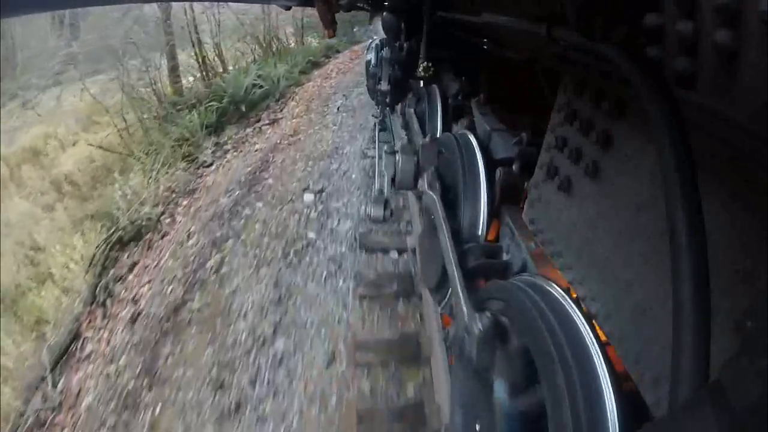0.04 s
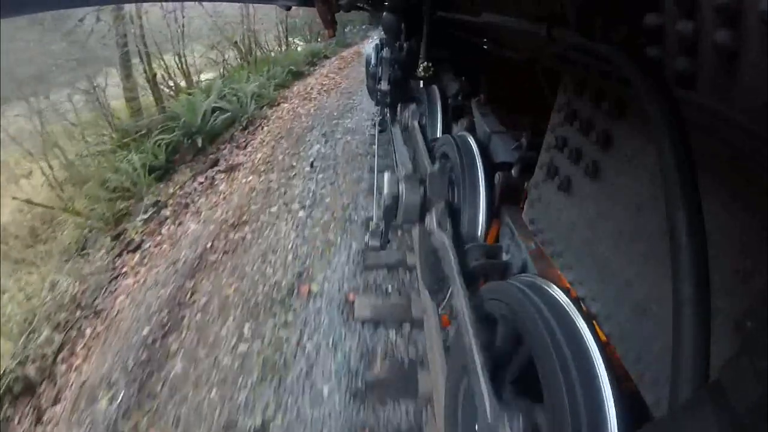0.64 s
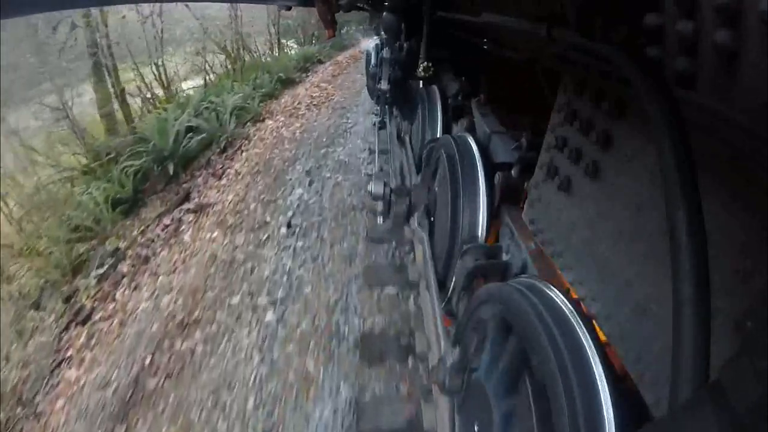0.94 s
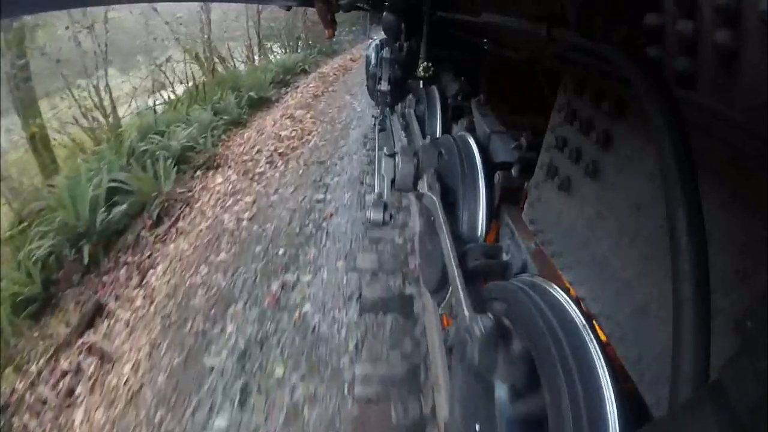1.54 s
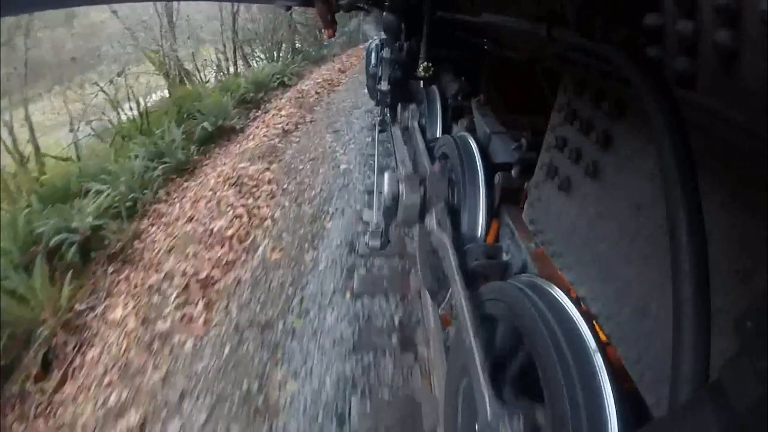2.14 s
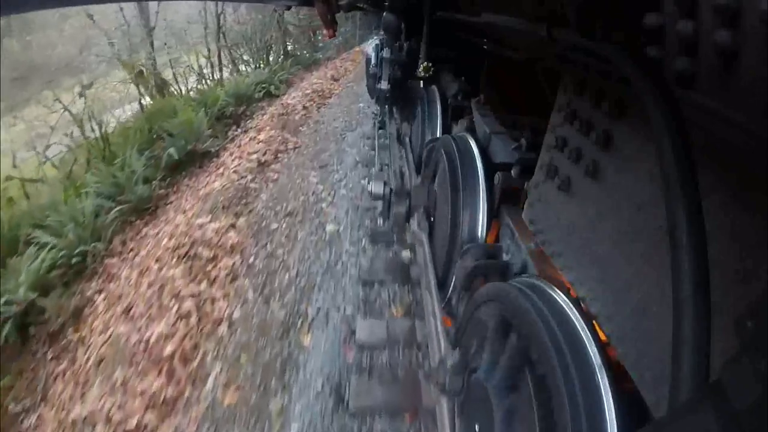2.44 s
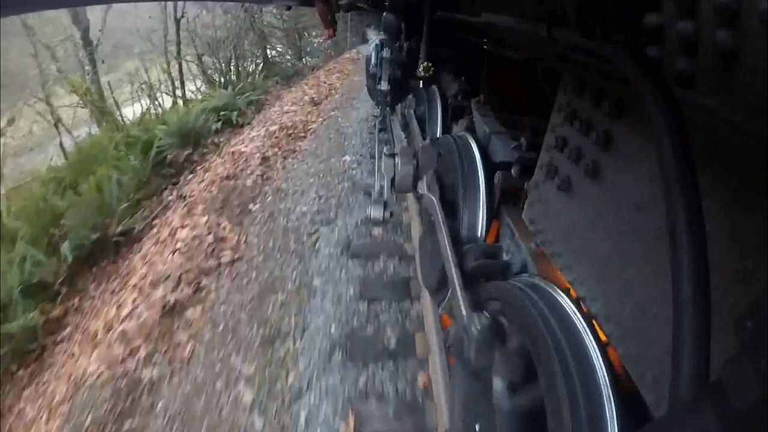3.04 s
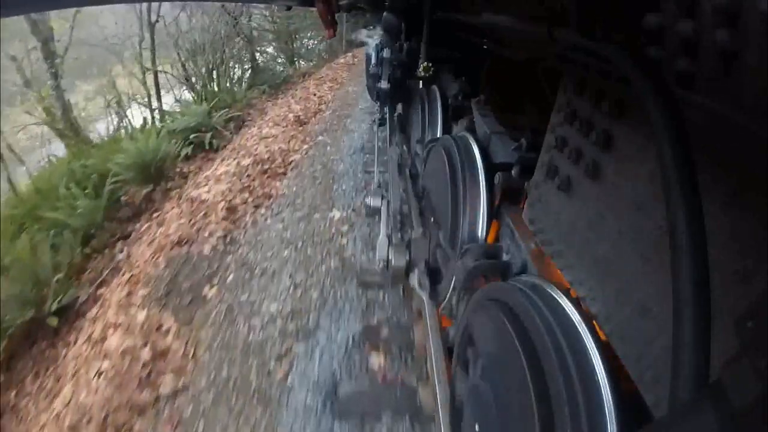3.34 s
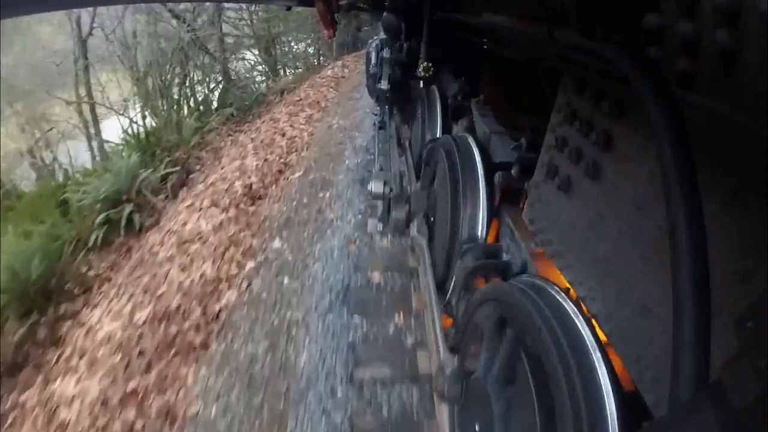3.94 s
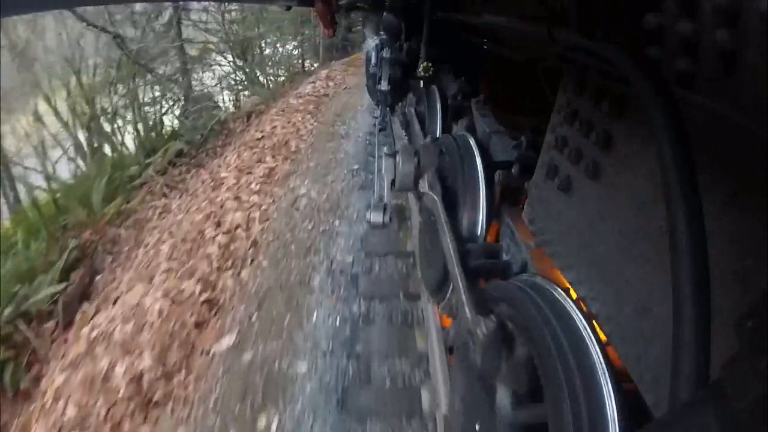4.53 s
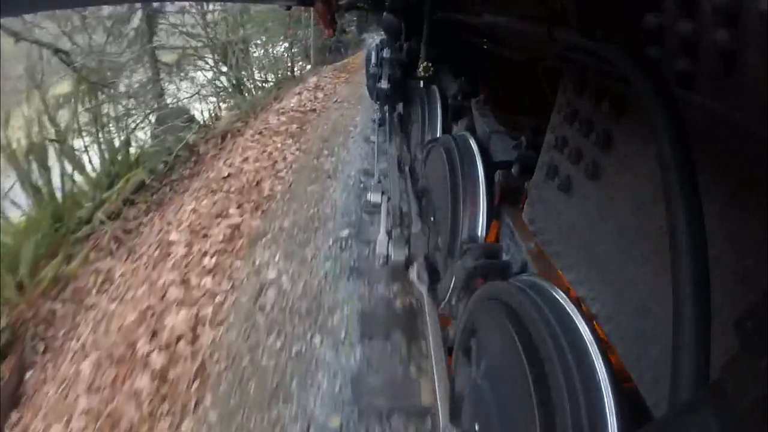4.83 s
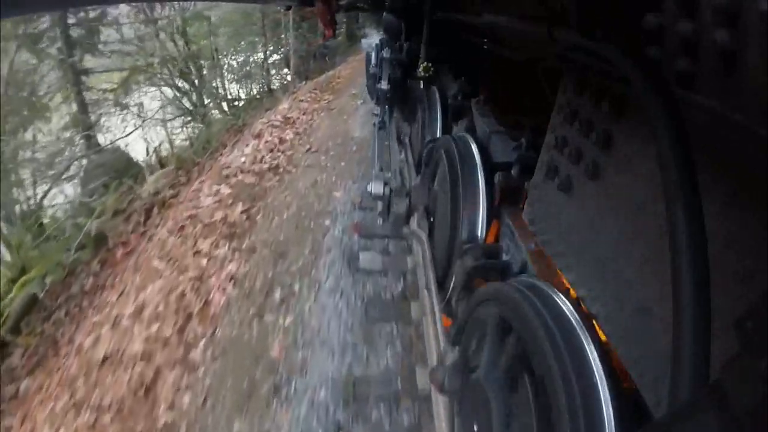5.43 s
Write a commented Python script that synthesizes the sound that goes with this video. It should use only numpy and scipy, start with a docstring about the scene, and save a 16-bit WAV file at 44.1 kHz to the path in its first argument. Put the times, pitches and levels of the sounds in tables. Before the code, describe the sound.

A steam locomotive is already running at a steady pace and continues for the whole five and a half seconds or so, heard close beside the driving wheels. Chuffs come evenly, five or six a second. Each has a spitting hiss and coarse rasp of steam, a stronger hollow roar with short booms from the steel frames, and usually a deep thump at its end. Underneath lies a continuous low rumble of wheels on rails and buffeting air, with small parts rattling. Loose rods give irregular dry knocks and brief clanks throughout, clearer around 0.2, 1.0, 2.1 to 2.5, 3.2 and 4.9 to 5.3 seconds. Faint, very short steel scrapes come at about 1.3 seconds and between 2.1 and 2.7. The rush drops away for a moment near 0.3, 0.7, 1.5 and 2.6 seconds, but the pace holds to the end.

```python
"""Steam rushes and hollow frames roar over a rumble of wheels on rails: a steam locomotive at a steady
pace, heard close beside the driving wheels. Four beats come with each wheel turn: steam hisses at the
cylinders, gusts set the frames roaring and booming, then the stroke thumps the air.
Small parts rattle, slack rod bearings knock, and dry steel scrapes now and then."""
import sys
import numpy as np
from scipy import signal
from scipy.fft import rfft, irfft
from scipy.io import wavfile
from scipy.ndimage import uniform_filter1d

SR = 44100
rng = np.random.default_rng(int(sys.argv[2]) if len(sys.argv) > 2 else 0)


def materialize(psi):
    """Save the field psi as 16-bit PCM at rate SR to the path in sys.argv[1].

    A 1-D psi becomes a single channel; in a 2-D psi each row is a channel.
    """
    bounded = np.clip(np.atleast_2d(psi).T, -1, 1)
    quanta = np.round(bounded * 32767).astype(np.int16)
    wavfile.write(sys.argv[1], SR, quanta)


N = 246078
TIME_S = np.arange(N) / SR
FREQ_HZ = np.fft.rfftfreq(N, 1 / SR)

# Table levels are relative within each layer.
# steam releases at the cylinders (time [s], rise [s], fade [s], level [dB], brightness [dB])
STEAM_RELEASES = [(0.035, 0.11, 0.11, -39, -1), (0.22, 0.081, 0.078, -37, 1),
                  (0.425, 0.1, 0.055, -39.5, -2.5), (0.64, 0.091, 0.13, -41, 0.5),
                  (0.8, 0.04, 0.046, -48, 1), (0.97, 0.067, 0.085, -40.5, 2), (1.151, 0.027, 0.015, -41, 0),
                  (1.341, 0.064, 0.074, -40, 0), (1.52, 0.053, 0.1, -44, -1.5),
                  (1.712, 0.051, 0.065, -38, 2), (1.97, 0.075, 0.06, -42.5, -0.5),
                  (2.149, 0.096, 0.12, -41, 3), (2.265, 0.06, 0.13, -40, 2.5), (2.445, 0.06, 0.057, -38, 2),
                  (2.654, 0.039, 0.098, -42.5, -1), (2.849, 0.061, 0.17, -40, 0.5),
                  (3.02, 0.061, 0.11, -36, 0.5), (3.2, 0.056, 0.039, -37, 3.5),
                  (3.413, 0.05, 0.049, -38.5, 3), (3.575, 0.083, 0.21, -38.5, -0.5),
                  (3.762, 0.036, 0.074, -38, 1.5), (3.932, 0.03, 0.06, -37.5, 1.5),
                  (4.136, 0.092, 0.06, -39.5, 0), (4.345, 0.086, 0.093, -40, 0.5),
                  (4.49, 0.067, 0.12, -37, -1), (4.695, 0.061, 0.031, -36, 0.5),
                  (4.78, 0.033, 0.038, -50, 1), (4.91, 0.055, 0.059, -40, 1),
                  (5.085, 0.065, 0.078, -37.5, 2), (5.255, 0.084, 0.091, -35, 0.5),
                  (5.425, 0.089, 0.11, -38, 1)]
# exhaust beats, four per wheel turn (time [s], fade [s], roar level [dB], rasp level [dB])
EXHAUST_BEATS = [(0.044, 0.11, -19, -30.5), (0.245, 0.084, -17.5, -27.5), (0.418, 0.1, -21.5, -32),
                 (0.618, 0.11, -23.5, -32), (0.803, 0.1, -22.5, -33.5), (1.013, 0.076, -19, -28.5),
                 (1.197, 0.26, -28.5, -33), (1.369, 0.093, -20, -33), (1.562, 0.12, -22, -30),
                 (1.756, 0.085, -22, -27.5), (1.947, 0.077, -20, -32.5), (2.14, 0.097, -19, -30.5),
                 (2.293, 0.18, -25, -30), (2.486, 0.088, -21.5, -31.5), (2.697, 0.087, -19.5, -31),
                 (2.868, 0.11, -20.5, -30), (3.022, 0.13, -19.5, -27.5), (3.246, 0.087, -21.5, -29),
                 (3.425, 0.077, -20.5, -31.5), (3.592, 0.13, -22.5, -28.5), (3.789, 0.084, -21.5, -33),
                 (3.968, 0.11, -20, -34), (4.15, 0.11, -20.5, -29.5), (4.372, 0.14, -20, -31),
                 (4.548, 0.062, -18.5, -29), (4.691, 0.11, -24, -29.5), (4.923, 0.076, -20.5, -28.5),
                 (5.107, 0.094, -21.5, -27.5), (5.278, 0.075, -20, -26.5), (5.429, 0.14, -21, -27)]
# spectra of the noise layers (frequency [Hz], level [dB])
HISS_SPECTRUM = [(700, -9), (1800, -2.5), (2030, 1), (2950, -2.5), (3370, 0.05), (3850, -3.5), (5200, -4.5),
                 (5900, -7), (6800, -5.5), (7900, -15), (8800, -17.5), (10000, -23), (12400, -29.5),
                 (14000, -68)]
RASP_SPECTRUM = [(250, -18), (450, 7.5), (540, 6.5), (680, 3), (880, 2.5), (1030, 4.5), (1250, -1.5),
                 (1550, -10.5), (2400, -23.5), (5000, -69)]
ROAR_SPECTRUM = [(60, -2.5), (110, -0.5), (160, -1), (290, -3.5), (410, 3.5), (480, -6.5), (800, -16.5),
                 (2000, -93)]
RUMBLE_SPECTRUM = [(4, -12), (12, 8), (32, 9), (52, -4.5), (80, -2.5), (130, -5), (250, -3.5), (800, -70),
                   (2000, -80)]
# resonances of frames and wheels (frequency [Hz], width [Hz], level [dB])
FRAME_MODES = [(170.7, 39.4, 2.5), (235.4, 20.5, 3.5), (283, 42, 4.5), (343.4, 27, 1), (398.3, 8.9, 1),
               (516, 41, -7), (578, 46, -9.5), (752, 280, -12.5), (1030, 230, -22), (2106, 130, -25.5)]
# single frame resonances set booming by beats (time [s], pitch [Hz], swell [s], level [dB])
FRAME_BOOMS = [(0.042, 394.0, 0.036, -31), (0.086, 278.6, 0.05, -26), (0.235, 238.8, 0.02, -19),
               (0.449, 388.0, 0.039, -18), (0.604, 167, 0.019, -24), (0.805, 335, 0.022, -21),
               (0.842, 286.4, 0.025, -15), (1.212, 388.0, 0.033, -17.5), (1.368, 173, 0.026, -23),
               (1.609, 239.7, 0.017, -23), (1.751, 167, 0.022, -18), (1.78, 278.6, 0.019, -16.5),
               (2.132, 232.0, 0.013, -24), (2.195, 159.5, 0.017, -22), (2.299, 279.5, 0.037, -20.5),
               (2.507, 286.6, 0.021, -15.5), (2.7, 394.3, 0.04, -22.5), (2.876, 171.6, 0.035, -26),
               (2.882, 281, 0.039, -25), (3.026, 154.8, 0.015, -18), (3.233, 287.2, 0.02, -18),
               (3.432, 389, 0.031, -21), (3.45, 286.0, 0.028, -17), (3.602, 159.4, 0.019, -16),
               (3.664, 232.0, 0.034, -21), (3.817, 280.0, 0.068, -21.5), (3.968, 365, 0.013, -18.5),
               (4.202, 388.0, 0.041, -20), (4.361, 351.5, 0.038, -20.5), (4.387, 269.5, 0.017, -17),
               (4.54, 165.5, 0.028, -25), (4.715, 340.0, 0.01, -13), (4.729, 279, 0.038, -23),
               (4.764, 300.0, 0.0082, -18), (4.913, 328.0, 0.013, -18), (5.131, 237.6, 0.012, -19),
               (5.31, 285, 0.041, -29), (5.32, 231.5, 0.024, -18.5), (5.448, 388.0, 0.012, -15.5),
               (5.455, 275, 0.015, -28), (5.515, 172.5, 0.01, -14)]
# deep thumps, mostly at the end of a beat (time [s], pitch [Hz], level [dB])
STROKE_THUMPS = [(0.122, 31.8, -13.5), (0.298, 32, -19), (0.518, 30, -19), (0.692, 31, -12.5),
                 (1.065, 40.2, -16), (1.167, 36.5, -11.5), (1.266, 36, -13.5), (1.444, 35, -15),
                 (1.633, 33, -15), (1.82, 31, -12.5), (2.021, 32, -13.5), (2.204, 30, -12.5),
                 (2.374, 28, -16), (2.568, 36, -12.5), (2.751, 32, -16), (2.932, 33, -16),
                 (3.123, 30.2, -14), (3.307, 38, -15.5), (3.48, 33, -18), (3.699, 33, -14.5),
                 (3.768, 33, -18.5), (3.864, 34.8, -15), (4.04, 30, -24), (4.251, 33, -15),
                 (4.555, 30, -16), (4.612, 36, -16.5), (4.811, 36, -15), (4.979, 29, -15),
                 (5.154, 32, -14.5), (5.349, 30, -16), (5.413, 32, -18), (5.529, 30, -20)]
# dips in the rush (time [s], depth [dB], recovery [s])
RUSH_LULLS = [(0.127, 2, 0.031), (0.257, 9, 0.052), (0.497, 2, 0.041), (0.703, 10, 0.06), (0.872, 2, 0.014),
              (1.455, 5, 0.062), (1.836, 4, 0.063), (2.578, 6.5, 0.19), (2.94, 3.5, 0.02),
              (3.248, 3.5, 0.12), (4.266, 4, 0.024), (4.582, 3, 0.04), (4.977, 2.5, 0.015)]
# rod and axle box knocks (time [s], blow pitch [Hz], blow level [dB], clank pitch [Hz], clank level [dB])
ROD_KNOCKS = [(0.163, 290, -14, 600, -32), (0.216, 240, -11.5, 900, -36), (0.232, 398, -15, 566, -18),
              (0.244, 312, -7.5, 560, -24), (0.476, 310, -10, 600, -40), (0.587, 230, -13, 1100, -32),
              (0.642, 402, -14, 1090, -21), (0.774, 333, -21, 1000, -29), (0.918, 232, -8, 600, -38),
              (0.978, 314, -10, 600, -35), (1.004, 230, -9, 600, -34), (1.04, 284, -11, 1000, -28),
              (1.346, 200, -14, 603, -27), (1.408, 200, -8.5, 600, -41), (1.932, 300, -8, 600, -27),
              (2.123, 298, -9, 600, -24), (2.179, 330, -15, 900, -26), (2.278, 380, -26, 750, -21),
              (2.294, 258, -7.5, 600, -29), (2.473, 356, -9.5, 610, -18.5), (2.804, 300, -19, 680, -30),
              (3.018, 380, -16, 700, -26), (3.034, 200, -19, 600, -21), (3.209, 330, -17, 600, -28),
              (3.218, 254, -5.5, 600, -37), (3.236, 320, -5.5, 600, -38), (3.622, 300, -22, 750, -26),
              (3.784, 300, -13, 600, -23), (3.951, 330, -15, 605, -26.5), (3.967, 353, -10, 600, -38),
              (4.178, 258, -12, 750, -28), (4.215, 350, -22, 600, -34), (4.308, 294, -12.5, 580, -24),
              (4.522, 300, -22, 960, -24), (4.91, 328, -18, 604, -21), (5.16, 330, -15, 780, -20),
              (5.274, 297, -14, 800, -29), (5.298, 280, -11, 600, -30), (5.406, 400, -23, 850, -22),
              (5.48, 304, -11.5, 600, -34)]
# steel scraping on steel (time [s], pitch [Hz], width [Hz], level [dB])
STEEL_SCRAPES = [(1.346, 3350, 400, -41), (2.143, 2670, 500, -38), (2.183, 2720, 500, -34.5),
                 (2.196, 2130, 900, -35), (2.28, 3460, 350, -40), (2.662, 1960, 400, -43)]


def gain_of(db):
    """Decibels to amplitude."""
    return 10 ** (np.asarray(db) / 20)


def unit_rms(x):
    """Scales to rms 1."""
    return x / np.sqrt(np.mean(x ** 2) + 1e-20)


def add(mix, at_s, sound):
    """Adds a sound to the mix in place."""
    part = mix[max(round(at_s * SR), 0):][:len(sound)]
    part += sound[:len(part)]


def colour(x, spectrum):
    """Filters by a spectrum interpolated over log frequency; rms 1."""
    hz, db = np.transpose(spectrum)
    curve_db = np.interp(np.log(FREQ_HZ + 1), np.log(hz), db)
    return unit_rms(irfft(rfft(x) * gain_of(curve_db), N))


def wander(rate_hz):
    """Low-passed random motion; rms 1."""
    return unit_rms(irfft(rfft(rng.standard_normal(N)) / (1 + (FREQ_HZ / rate_hz) ** 4), N))


def swell(at_s, rise_s, fall_s, steepness=2):
    """Gaussian rise to 1 at at_s; a steeper fall holds longer, then drops harder."""
    t = TIME_S - at_s
    decay = np.where(t < 0, (t / rise_s) ** 2, abs(t / fall_s) ** steepness)
    return np.exp(-np.minimum(decay, 20))


def beat_envelope(times_s, rises_s, fades_s, levels_db, floor_db, steepness=2.3):
    """Each beat swells, holds and shuts off over a steady floor."""
    beats = np.broadcast(times_s, rises_s, fades_s, levels_db)
    power = sum((gain_of(db) * swell(at_s, rise_s, fade_s, steepness)) ** 2
                for at_s, rise_s, fade_s, db in beats)
    return np.sqrt(power + gain_of(floor_db) ** 2)


def turbulence(low_hz=7.0, high_hz=37.2):
    """Shudder quicker than the beats, soft-limited to +/-2."""
    highpass = signal.butter(2, low_hz, "highpass", fs=SR, output="sos")
    shudder = unit_rms(signal.sosfilt(highpass, wander(high_hz)))
    return 2 * np.tanh(shudder / 2)


def clatter(rate_hz, spread_db):
    """Tiny impacts at random times, a few of them large."""
    size = gain_of(spread_db * np.minimum(rng.exponential(1, N), 4))
    sign = rng.choice([-1., 1.], N)
    hits = rng.random(N) < rate_hz / SR
    return unit_rms(size * sign * hits)


def swirl(x, depth_db=1.3, span_s=0.027, span_hz=500):
    """Swirling air: patches of the spectrum swell and fade."""
    size, hop = 512, 128
    spectra = signal.stft(x, nperseg=size, noverlap=size - hop)[2]
    patches = rng.standard_normal(spectra.shape)
    for _ in range(2):
        patches = uniform_filter1d(patches, round(span_hz * size / SR), axis=0)
        patches = uniform_filter1d(patches, round(span_s * SR / hop), axis=1)
    spectra *= gain_of(depth_db * unit_rms(patches))
    return unit_rms(signal.istft(spectra, nperseg=size, noverlap=size - hop)[1][:N])


def plate_echoes(x, gain=0.073, spread_s=0.012):
    """Eight short reflections from nearby steel plates."""
    out = x.copy()
    for place, sign in zip(rng.random(8), rng.choice([-1., 1.], 8)):
        add(out, spread_s * (0.1001 + place), sign * gain * x)
    return unit_rms(out)


def steam_hiss(grit, shudder, shudder_db=1.09, spit=0.29, pivot_hz=4000):
    """Steam hisses and spits at the cylinders around each beat, now airy, now dull."""
    times_s, rises_s, fades_s, levels_db, brightness_db = np.transpose(STEAM_RELEASES)
    envelope = beat_envelope(times_s, rises_s, fades_s, levels_db, floor_db=-43)
    jet = plate_echoes(swirl(rng.standard_normal(N) + spit * grit))
    hiss = colour(jet * gain_of(shudder_db * shudder), HISS_SPECTRUM)
    lows = signal.sosfiltfilt(signal.butter(3, pivot_hz, fs=SR, output="sos"), hiss)
    tilt = gain_of(np.interp(TIME_S, times_s, brightness_db) / 2)
    return envelope * (lows / tilt + (hiss - lows) * tilt)


def steam_rasp(envelope, grit, shudder, gain_db=-1.0, shudder_db=1.35, rattle=0.35):
    """Coarse, low rush of steam under the hiss."""
    jet = plate_echoes(rng.standard_normal(N) + rattle * grit)
    return gain_of(gain_db) * envelope * colour(jet * gain_of(shudder_db * shudder), RASP_SPECTRUM)


def frame_roar(envelope, shudder, ring_db=-5.5, broad_db=-8.0, shudder_db=1.13, rattle=0.6):
    """Gusts and rattling parts fill the hollow frames and drive their resonances."""
    drive = rng.standard_normal(N) + rattle * clatter(rate_hz=260, spread_db=3.4)
    drive *= gain_of(shudder_db * shudder)
    f = FREQ_HZ + 1
    power = sum(gain_of(db) ** 2 / (1 + ((f * f - hz * hz) / (f * width_hz)) ** 2) ** 1.66
                for hz, width_hz, db in FRAME_MODES)
    ring = unit_rms(irfft(rfft(drive) * np.sqrt(power), N))
    broad = colour(drive, ROAR_SPECTRUM)
    return envelope * (gain_of(ring_db) * ring + gain_of(broad_db) * broad)


def wheel_rumble(roar_envelope, lull, level_db=-28.0):
    """Wheels roll on rails and air buffets past, heaving with the beats and sinking in the lulls."""
    heave = unit_rms(roar_envelope ** 0.23 * lull ** 0.58)
    return gain_of(level_db) * heave * colour(rng.standard_normal(N), RUMBLE_SPECTRUM)


def frame_booms(gain_db=-0.5, waver=0.011, waver_hz=29.6):
    """Single frame resonances swell and die, unsteady in pitch."""
    out, t = np.zeros(N), np.arange(-SR // 8, SR // 8) / SR
    bend = 1 + waver * wander(waver_hz)
    for at_s, hz, swell_s, db in FRAME_BOOMS:
        phase, place = rng.random(2)
        pitch_hz = hz * bend[int(place * (N - len(t))):][:len(t)]
        cycles = phase + np.cumsum(pitch_hz) / SR
        envelope = gain_of(db + gain_db) * np.exp(-(t / swell_s) ** 2)
        add(out, at_s + t[0], envelope * np.sin(2 * np.pi * cycles))
    return out


def stroke_thumps(rise_s=0.027, fall_s=0.013, gain_db=-1.5, snap=0.36, snap_s=0.00075):
    """Each stroke pushes the air, sucks it back sharply and lets it swing out."""
    out, t = np.zeros(N), np.arange(-SR // 20, SR // 8) / SR
    envelope = np.exp(-np.where(t < 0, (t / rise_s) ** 2, t / fall_s))
    tip = snap / np.cosh(t / snap_s)  # sharp tip of the pressure drop
    for at_s, hz, db in STROKE_THUMPS:
        swing = envelope * np.cos(2 * np.pi * hz * t)
        add(out, at_s + t[0], -gain_of(db + gain_db) * (swing + tip))
    return out


def lull_gain(cut_s=0.013):
    """Now and then the rush drops away quickly and recovers more slowly."""
    dip_db = sum(depth_db * swell(at_s, cut_s, recovery_s, steepness=1.8)
                 for at_s, depth_db, recovery_s in RUSH_LULLS)
    return gain_of(-dip_db)


def frame_ring(t, damping=0.6):
    """Struck frames ring, mode phases varying with the place struck; peak 1."""
    hz, width_hz, db = np.transpose(FRAME_MODES)[:, :, None]
    cycles = hz * t + rng.random(hz.shape)
    envelopes = gain_of(db) * width_hz * np.exp(-np.pi * width_hz * damping * t)
    ring = (envelopes * np.sin(2 * np.pi * cycles)).sum(0)
    return ring / abs(ring).max()


def rod_knocks(blow_gain_db=-3.0, ring_db=-8.0, contact_s=0.003, clank_s=0.0068, cutoff_hz=3200):
    """Slack rod bearings close with a dry blow; the frames ring and the metal clanks briefly."""
    out, t = np.zeros(N), np.arange(SR // 4) / SR
    metal = colour(rng.standard_normal(N), RASP_SPECTRUM)
    from_peak_s = t - contact_s
    attack = np.minimum(2 * t / contact_s, 1)
    fade = np.exp(-t / clank_s)
    fade_rms = np.sqrt(np.mean(fade ** 2))
    for at_s, blow_hz, blow_db, clank_hz, clank_db in ROD_KNOCKS:
        thud = np.exp(-(from_peak_s / contact_s) ** 2) * np.sin(2 * np.pi * blow_hz * from_peak_s)
        blow = attack * (thud + gain_of(ring_db) * frame_ring(t))
        edges_hz = [clank_hz / 2 ** 0.25, clank_hz * 2 ** 0.25]
        band = signal.butter(1, edges_hz, "bandpass", fs=SR, output="sos")
        burst = metal[rng.integers(N - len(t)):][:len(t)]
        clank = fade_rms * unit_rms(signal.sosfilt(band, burst) * fade)
        add(out, at_s, gain_of(blow_db + blow_gain_db) * blow + gain_of(clank_db) * clank)
    return signal.sosfilt(signal.butter(3, cutoff_hz, fs=SR, output="sos"), out)


def steel_scrapes(rise_s=0.0097, fall_s=0.0072):
    """Dry steel catches for a moment: a narrow band of noise."""
    out, noise = np.zeros(N), rng.standard_normal(N)
    for at_s, hz, width_hz, db in STEEL_SCRAPES:
        band = signal.butter(2, [hz - width_hz / 2, hz + width_hz / 2], "bandpass", fs=SR, output="sos")
        out += gain_of(db) * swell(at_s, rise_s, fall_s) * unit_rms(signal.sosfilt(band, noise))
    return out


def scene():
    """Mono mix; roar and steam share one shudder and the same lulls."""
    times_s, fades_s, roar_db, rasp_db = np.transpose(EXHAUST_BEATS)
    roar_rise_s, rasp_rise_s = 0.044, 0.087
    roar_envelope = beat_envelope(times_s, roar_rise_s, fades_s, roar_db, floor_db=-29.5)
    rasp_envelope = beat_envelope(times_s, rasp_rise_s, 0.95 * fades_s, rasp_db, floor_db=-39.5)
    shudder, lull = turbulence(), lull_gain()
    roar = frame_roar(roar_envelope, shudder)
    grit = clatter(rate_hz=400, spread_db=2.5)
    steam = steam_hiss(grit, shudder) + steam_rasp(rasp_envelope, grit, shudder)
    events = frame_booms() + stroke_thumps() + steel_scrapes() + rod_knocks()
    return ((steam + roar) * lull + events + wheel_rumble(roar_envelope, lull))[None]


def record(dry, low_hz=5, high_hz=13200):
    """The microphone loses the slowest pressure swings and the top treble."""
    highpass = signal.butter(1, low_hz, "highpass", fs=SR, output="sos")
    lowpass = signal.firwin(301, high_hz, window=("kaiser", 9), fs=SR)
    return signal.oaconvolve(signal.sosfilt(highpass, dry), lowpass[None], "same")


dry = scene()
out = record(dry)
materialize(out)
```